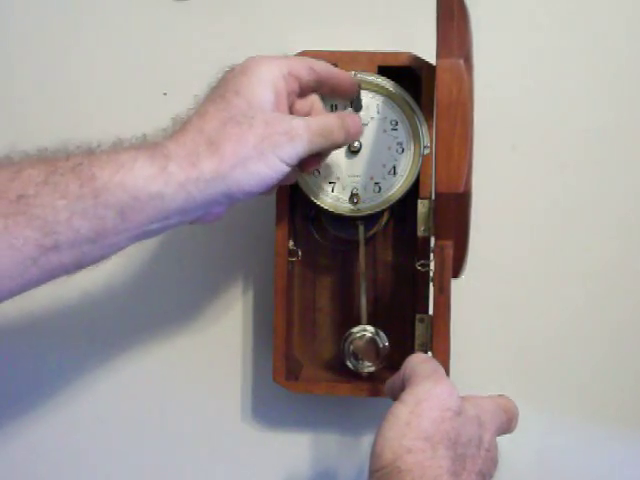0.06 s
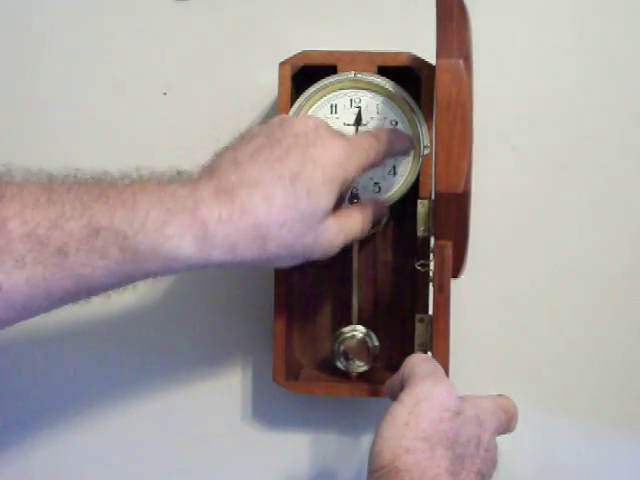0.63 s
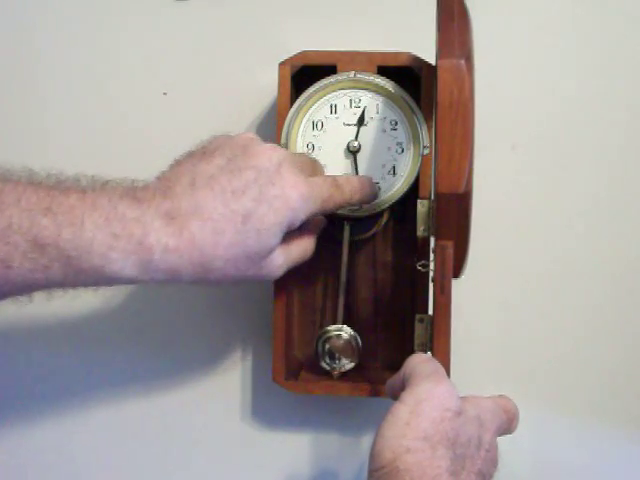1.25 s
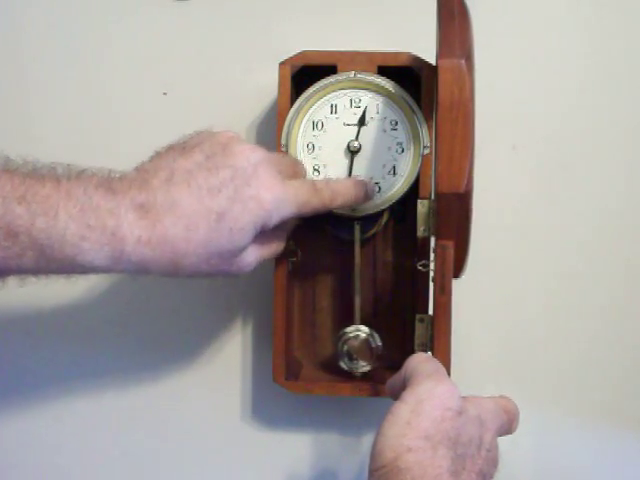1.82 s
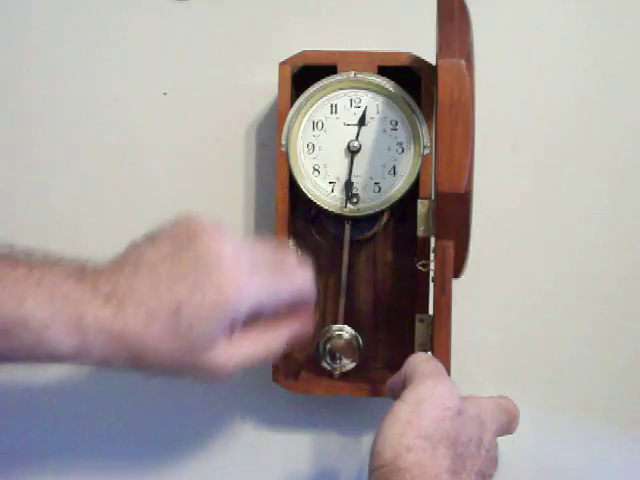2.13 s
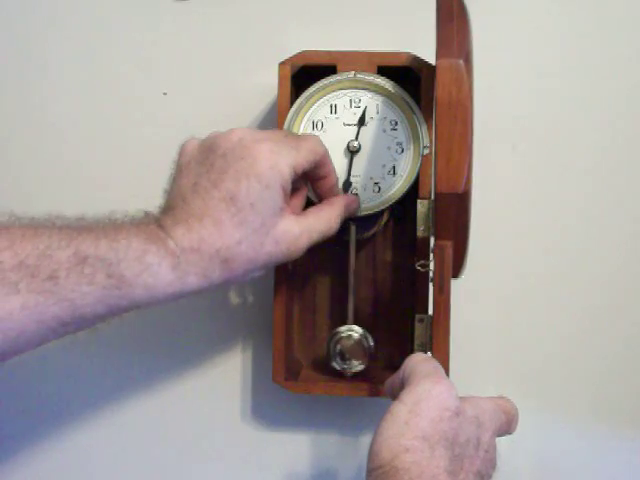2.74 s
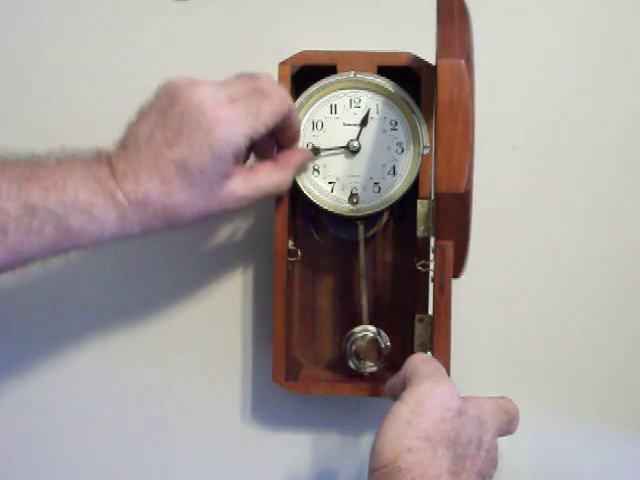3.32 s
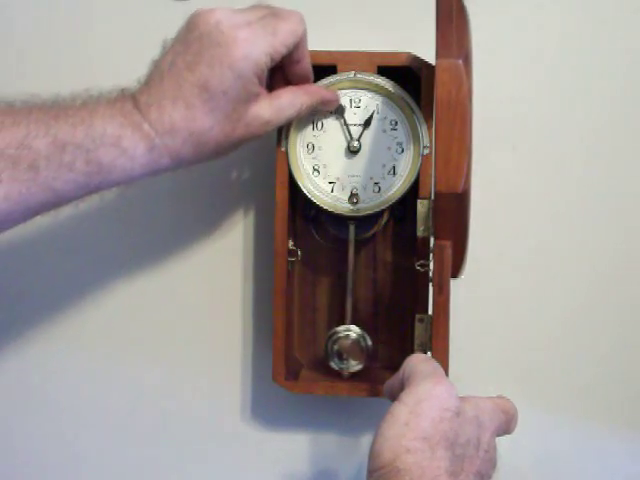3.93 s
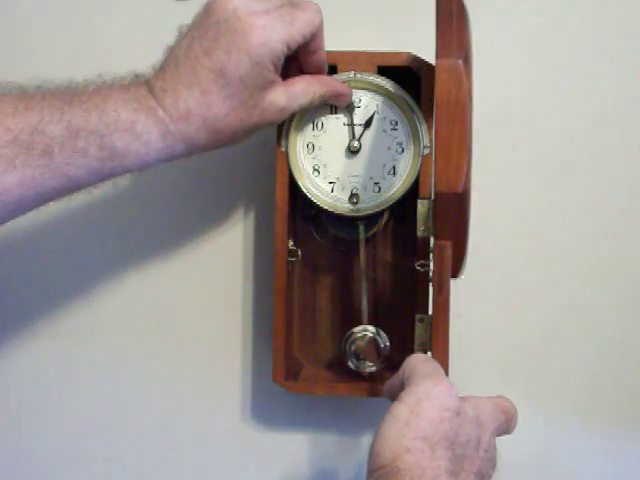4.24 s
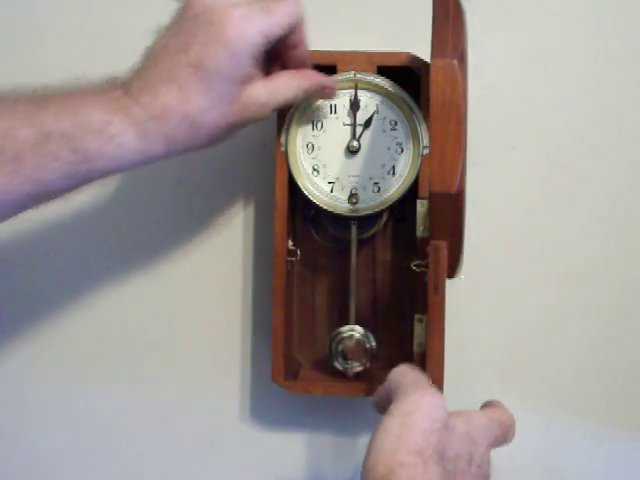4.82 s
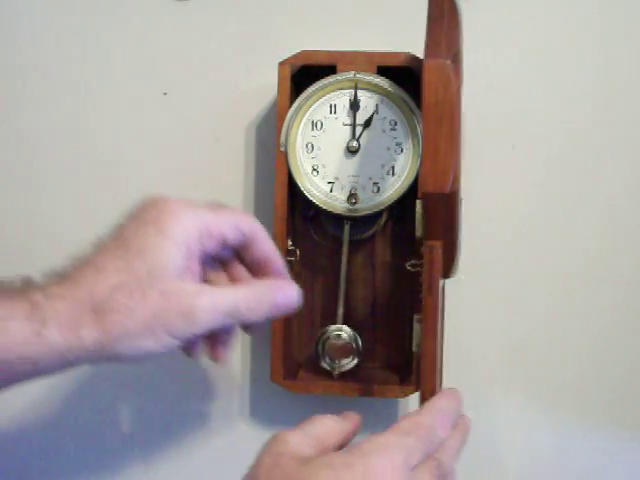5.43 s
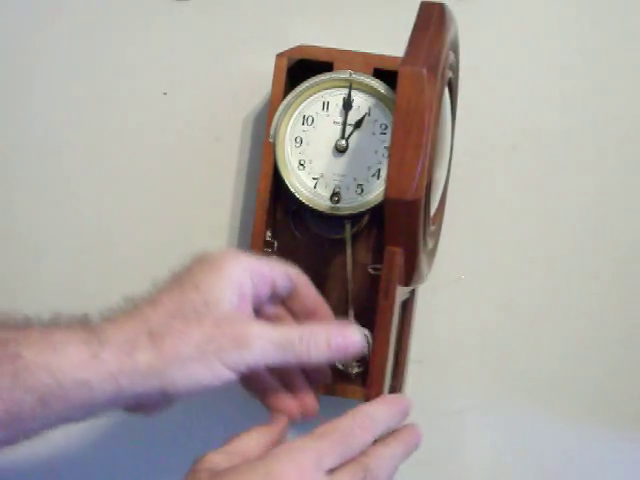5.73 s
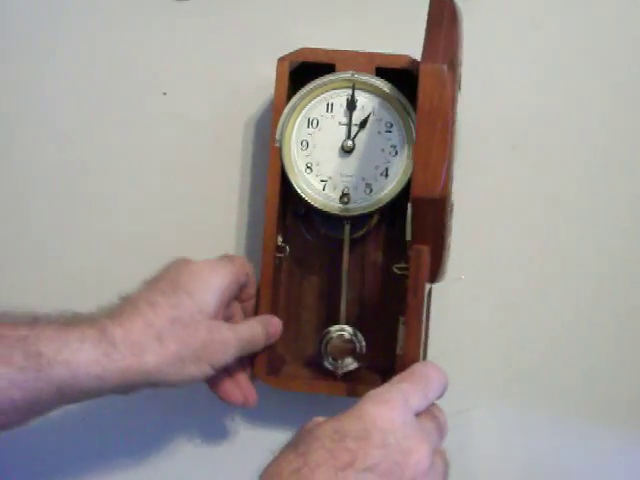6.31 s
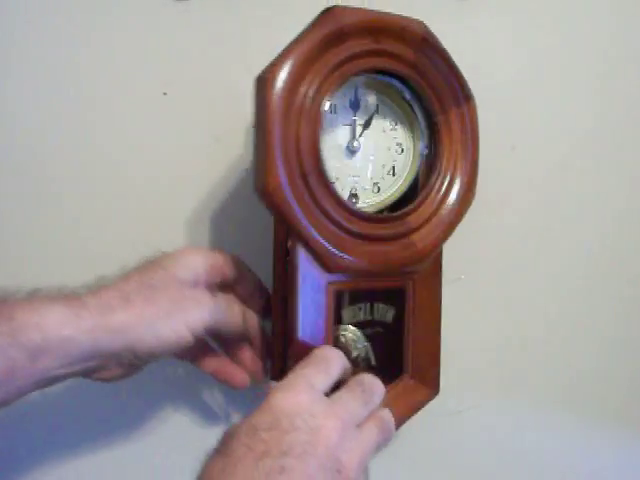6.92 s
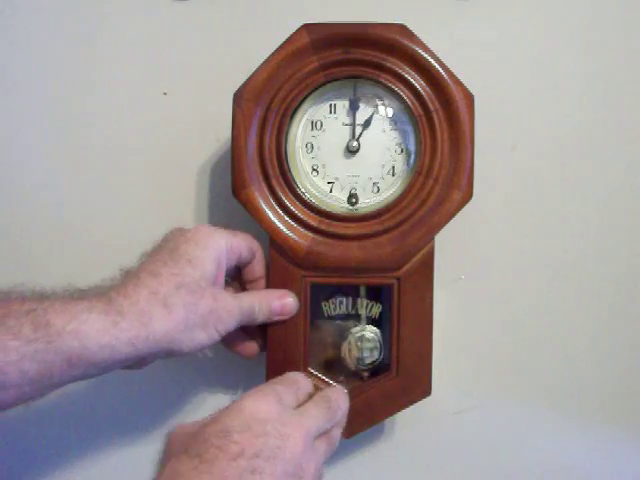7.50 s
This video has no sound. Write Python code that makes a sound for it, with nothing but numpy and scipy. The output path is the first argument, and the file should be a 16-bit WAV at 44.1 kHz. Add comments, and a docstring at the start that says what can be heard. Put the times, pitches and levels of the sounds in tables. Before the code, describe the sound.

Over room hiss, a pendulum clock ticks unevenly, its high bell strikes twice, seconds apart, and its door closes with a loud, rattling knock.

```python
"""Room hiss and the last faint ring of a bell are heard first, then a small pendulum wall clock ticks
as its pallets catch the escape wheel. A finger turns the minute hand, with light touches and rubs.
A hammer strikes the bell once at the half hour and once at the hour; two close partials beat in its ring.
Last, the glazed wooden door bumps, knocks shut close to the microphone and rattles."""
import sys
import numpy as np
from scipy import signal
from scipy.fft import rfft, irfft
from scipy.io import wavfile
from scipy.ndimage import uniform_filter1d

SR = 44100
rng = np.random.default_rng(int(sys.argv[2]) if len(sys.argv) > 2 else 0)


def master_out(mix):
    """Clip the mix to full scale and print it as 16-bit PCM to the path in sys.argv[1]."""
    frames = np.transpose(np.atleast_2d(mix))
    ceiling = np.clip(frames, -1, 1)
    pcm = np.round(ceiling * 32767).astype(np.int16)
    wavfile.write(sys.argv[1], SR, pcm)


N = 333396
TIME = np.arange(N) / SR
AFTER = TIME[:SR // 2]  # time since a blow

# spectra of the room's hiss and rumble: (f/Hz, relative level/dB)
HISS_SPECTRUM = [(88, -36.5), (150, -1.5), (282, -3.5), (353, -2), (448, -5.5), (537, -2.5), (652, -7),
                 (816, -5), (1680, -11.5), (1890, -11), (2590, -14), (4180, -13), (5400, -19.5),
                 (7020, -67), (11900, -120)]
RUMBLE_SPECTRUM = [(5, -8), (25, 5), (42, 1), (55, -2), (64, -0.5), (85, -12.5), (116, -2.5), (145, -12),
                   (200, -32), (500, -74.5)]
# reverberation time of the room: (f/Hz, T60/s)
ROOM_DECAY = [(150, 0.19), (1000, 0.6), (3500, 0.45), (6000, 0.22)]
# the bell's three partials: (f/Hz), and for each of them (level/dB, T60/s)
BELL_HZ = [2995.2, 3076.7, 3678]
BELL_PARTIALS = [(1.5, 2.725), (-11.5, 3), (-18, 0.32)]
# strokes of the bell: (t/s, hammer/dB, back board/dB, ring/dB, boost of the second partial/dB)
STROKES = [(1.6445, -13.5, -33, -11.5, 1), (4.459, -12, -27.5, -12.5, 3.5)]
# the ring dips briefly after each stroke: (t/s, depth/dB, half width/s)
RING_DIPS = [(1.913, 2.698, 0.055), (4.604, 6.199, 0.19)]
# tick and tock in turn, made uneven by the finger on the hand: (t/s, level/dB, thin edge/dB)
TICKS = [(0.3064, -18, 0), (0.6071, -21, -1), (1.1502, -18, -2), (1.4534, -23, 8.5), (2.030, -24.5, -2),
         (2.2964, -23, -6), (2.837, -16.5, -10), (3.1357, -19, 3.5), (3.6615, -20.5, -5),
         (3.9644, -26.5, -1), (4.516, -20.5, -3), (4.8157, -25, -17)]
# contact spectra of metal, of the thin edge on top of it and of wood: (f/Hz, relative level/dB)
SNAP_SPECTRUM = [(100, -42), (2000, -13.5), (2900, 2), (3800, 9), (4350, 4), (4750, -14), (6500, -17)]
EDGE_SPECTRUM = [(1000, -51), (4200, -8.5), (4850, 4), (5400, -4), (6000, -11), (7500, -20)]
CLACK_SPECTRUM = [(60, -30), (400, -6), (1100, -2), (1700, -3.5), (2050, -9.5), (2330, 0.5), (2650, -13.5),
                  (6000, -29)]
# modes of the brass movement, wooden case and back board: (f/Hz, relative level/dB, T60/s)
BRASS_MODES = [(2970, -4, 0.085), (3140, -2.5, 0.063), (3370, -1.5, 0.039), (3620, -1, 0.059),
               (3890, -2.5, 0.055), (4020, -3, .04), (4190, -2, 0.051), (4580, -9.5, 0.042),
               (4910, -2, 0.026), (5320, -4.5, 0.024)]
CASE_MODES = [(1063, -5, 0.18), (1198, -4.5, 0.11), (1378, -7.5, 0.092), (1570, -9, 0.044), (1710, -5, .06),
              (2176, -5, 0.077), (2356, -3.5, 0.055)]
BOARD_MODES = [(607, 2, 0.22), (651, -0.5, 0.29), (505, -7.5, 0.12)]
# lever release, hammer impact and bounce: (delay/s, relative level/dB, hardness/dB, thin edge/dB)
HAMMER_CONTACTS = [(-0.003, -9, 8.5, 8.5), (0, 1.5, 3.5, -6.5), (0.0046, -11, 5.5, -9.5)]
# light touches on the hand, levers and case: (t/s, level/dB, hardness/dB)
TOUCHES = [(1.703, -27.5, 3), (2.125, -30, -1), (3.639, -35, 3), (4.045, -35, -0.5), (5.024, -37.5, -5),
           (6.007, -34, -4), (6.073, -32.5, 0), (6.203, -33.5, -3.5), (6.99, -34.5, -5.5), (7.195, -29, 5)]
# a train of tiny dry pips on each ring: (t/s, level/dB, fade/(dB/s))
PIP_TRAINS = [(1.759, -24.5, 17), (4.535, -14, 55)]
# hands slide on dial and case and swing the door: (t/s, duration/s, rub/dB, scuff/dB, swish/dB)
RUBS = [(1.78, 0.29, -53, -41.5, -58), (3.982, 0.17, -63, -38, -61), (5.018, 0.2, -47, -41, -64),
        (5.45, 0.31, -34, -51, -44.5), (6.0, 0.55, -36.5, -56, -53)]
# low, middle and high spectra of that friction: (f/Hz, relative level/dB)
RUB_SPECTRUM = [(40, -3.5), (115, 2), (200, 0), (280, -27), (1100, -36)]
SCUFF_SPECTRUM = [(200, -28), (700, -6), (1100, -3.5), (2000, -1.5), (2700, -17), (6000, -24.5)]
SWISH_SPECTRUM = [(1000, -25.5), (3000, -12.5), (4400, 8.5), (5200, 12.5), (6000, -14), (8000, -30.5)]
# soft bumps of door and hand on the case: (t/s, level/dB, f/Hz, rise time/s)
BUMPS = [(7.2, -16, 401, 0.0059), (7.239, -22.5, 147, 0.0062), (7.478, -19, 180, 0.0074),
         (7.539, -5.5, 234, 0.0017)]
# blows of the door as it shuts and rebounds: (t/s, level/dB, decay time/s)
DOOR_BLOWS = [(7.4264, -0.5, 0.0038), (7.4275, 2.5, 0.0022), (7.452, -16, 0.013), (7.473, -20, .003),
              (7.5264, -8.5, 0.0017)]
# modes of the door: (f/Hz, relative level/dB, T60/s)
DOOR_MODES = [(105.6, -10, 0.69), (162, -2, 0.33), (274, -10, .35), (422, 4, 0.28), (713, 16, 0.11),
              (1056, -13, .25), (1280, -9, .25), (1480, -10, .3), (2570, -10, .15)]
# spectra of the door's knock and rattle: (f/Hz, relative level/dB)
KNOCK_SPECTRUM = [(40, -17.5), (200, 7.5), (700, 1.5), (1300, 5.5), (1700, -21), (2100, 0), (3000, 1.5),
                  (4000, -8), (5400, -14.5), (7000, -38)]
RATTLE_SPECTRUM = [(24, -47), (40, -25), (108, -1), (141, -10), (268, -2), (336, -9), (769, -13),
                   (908, -16.5), (1190, -7), (1370, -8.5), (1490, -7.5), (1760, -18.5), (2300, -15.5),
                   (4190, -23), (5600, -35), (7280, -65), (12300, -120)]


def amp(db):
    """Amplitude ratio of a level in decibels."""
    return 10 ** (np.asarray(db) / 20)


def unit_rms(x):
    """Normalisation to an rms of 1."""
    return x / np.sqrt(np.mean(x ** 2) + 1e-20)


def curve_at(points, hz):
    """Interpolation on a logarithmic frequency axis."""
    f, value = np.transpose(points)
    return np.interp(np.log(hz + 1), np.log(f + 1), value)


def add(mix, start, sound):
    """Superposition: a sound joins the mix at its start time in seconds."""
    part = mix[max(round(start * SR), 0):][:len(sound)]
    part += sound[:len(part)]


def coloured(x, spectrum):
    """Spectral shaping: x is filtered by a spectrum and scaled to rms 1."""
    gain = amp(curve_at(spectrum, np.fft.rfftfreq(len(x), 1 / SR)))
    return unit_rms(irfft(rfft(x) * gain, len(x)))


def crack(spectrum, decay_s):
    """Contact transient: a brief force has a broad spectrum, here a fast-decaying puff of noise."""
    envelope = np.exp(-AFTER / decay_s) * (1 - np.exp(-AFTER / 0.00038))
    puff = coloured(rng.standard_normal(len(AFTER)), spectrum) * envelope
    return puff * np.linalg.norm(envelope) / np.linalg.norm(puff)


def ring(modes):
    """Free vibration: a sum of damped modes, excited a little differently by each blow."""
    hz, db, t60 = np.transpose(modes)[:, :, None]
    sizes = amp(db + 2 * rng.standard_normal(db.shape))
    waves = np.sin(2 * np.pi * (hz * AFTER + rng.random(hz.shape))) * amp(-60 * AFTER / t60)
    onset = 1 - np.exp(-AFTER / 0.0005)
    return (sizes * waves).sum(0) / np.sqrt(np.sum(sizes ** 2) / 2) * onset


def reverberation(x, echoes_per_s=3000):
    """Sparse reflections in a small room; absorption gives each band its own decay rate."""
    signs = rng.choice([-1., 1.], len(AFTER))
    arrivals = (rng.random(len(AFTER)) < echoes_per_s / SR) * (AFTER > .005)
    hz, t, bands = signal.stft(signs * arrivals, SR, nperseg=256)
    decay = amp(-60 * t / curve_at(ROOM_DECAY, hz)[:, None])
    tail = signal.istft(bands * decay, SR, nperseg=256)[1]
    return signal.fftconvolve(x, tail / np.linalg.norm(tail))[:N]


def room_noise(hiss_db=-34, rumble_db=-33, waver_db=0.15):
    """Broadband noise: a hiss with slight, slow amplitude modulation lies over a low rumble."""
    rates_hz = np.geomspace(.5, 12, 20)
    waver = unit_rms(sum(np.sin(2 * np.pi * (f * TIME + rng.random())) / np.sqrt(f) for f in rates_hz))
    hiss = coloured(rng.standard_normal(N), HISS_SPECTRUM) * amp(hiss_db + waver_db * waver)
    rumble = coloured(rng.standard_normal(N), RUMBLE_SPECTRUM) * amp(rumble_db)
    return hiss + rumble


def bell(build_s=0.0067, linger_db=-39.5, linger_boost_db=5.5):
    """Interference: two close partials beat at their difference, about 80 Hz; a third dies quickly."""
    rings = [(0, linger_db, linger_boost_db)]  # an earlier stroke is still dying away
    rings += [(start, ring_db, boost_db) for start, _, _, ring_db, boost_db in STROKES]
    onset = 1 - np.exp(-TIME / build_s)  # the tone takes a moment to fill the case
    out = np.zeros(N)
    for start, ring_db, boost_db in rings:
        for hz, (db, t60), extra_db in zip(BELL_HZ, BELL_PARTIALS, (0, boost_db, 0)):
            envelope = amp(ring_db + db + extra_db - 60 * TIME / t60) * onset
            add(out, start, envelope * np.sin(2 * np.pi * (hz * TIME + rng.random())))
    dip_db = sum(depth * np.exp(-((TIME - centre) / width) ** 2) for centre, depth, width in RING_DIPS)
    return out * amp(-dip_db)


def clicks(contacts, snap_db, brass_db, clack_db, case_db, snap_s, clack_s, room_db, lag_s=0.000987):
    """Coupled vibration: metal meets metal, then the case answers; hardness favours metal over wood."""
    out = np.zeros(N)
    for start, db, hard_db, edge_db in contacts:
        edge = amp(edge_db) * crack(EDGE_SPECTRUM, snap_s)
        metal = amp(snap_db) * crack(SNAP_SPECTRUM, snap_s) + amp(brass_db) * ring(BRASS_MODES)
        wood = amp(clack_db) * crack(CLACK_SPECTRUM, clack_s) + amp(case_db) * ring(CASE_MODES)
        add(out, start, amp(db) * (edge + amp(hard_db) * metal))
        add(out, start + lag_s, amp(db - hard_db) * wood)
    return out + amp(room_db) * reverberation(out)


def escapement(tick_hard_db=3, tock_hard_db=5):
    """Impact excitation: two pallets catch the wheel in turn, one sounding woody, the other bright."""
    contacts = [(start, db, tock_hard_db if k % 2 else tick_hard_db, edge_db)
                for k, (start, db, edge_db) in enumerate(TICKS)]
    return clicks(contacts, snap_db=0, brass_db=-7, clack_db=1.5, case_db=-3.5,
                  snap_s=0.0023, clack_s=0.0052, room_db=-8.5)


def hammer():
    """Impact and rebound: at each stroke the lever lets go, and the hammer lands and bounces."""
    contacts = [(start + delay, stroke_db + db, hard_db, edge_db)
                for start, stroke_db, *_ in STROKES
                for delay, db, hard_db, edge_db in HAMMER_CONTACTS]
    return clicks(contacts, snap_db=3, brass_db=-5, clack_db=3, case_db=-8.5,
                  snap_s=0.0019, clack_s=0.0036, room_db=-6)


def back_board():
    """Structure-borne sound: the hammer's heavy blow crosses the frame to the back board's low modes."""
    out = np.zeros(N)
    for start, _, board_db, _, _ in STROKES:
        add(out, start, amp(board_db) * ring(BOARD_MODES))
    return out


def touches(edge_db=-7, edge_growth=1.7):
    """Soft impacts last longer: fingers, levers and door click, with more thin edge the harder they hit."""
    contacts = [(start, db, hard_db, edge_db + edge_growth * hard_db) for start, db, hard_db in TOUCHES]
    return clicks(contacts, snap_db=0, brass_db=-9.5, clack_db=-1, case_db=-6.5,
                  snap_s=0.0072, clack_s=0.012, room_db=-8.5)


def pips(hz=3700, width_s=0.00076, period_s=0.0567, count=4):
    """Tone bursts: a few cycles under a Gaussian envelope recur evenly and fade over each ring."""
    t = np.arange(-SR // 200, SR // 200) / SR
    envelope = np.exp(-.5 * (t / width_s) ** 2)
    out = np.zeros(N)
    for start, db, fade_db_per_s in PIP_TRAINS:
        for delay in np.arange(count) * period_s:
            pip = envelope * np.sin(2 * np.pi * (hz * t + rng.random()))
            add(out, start + delay + t[0], amp(db - fade_db_per_s * delay) * pip)
    return out


def rubs(grip_db=3, slip_s=0.018):
    """Sliding friction: skin drags unevenly over dial and varnished wood with a rub, scuff and swish."""
    spectra = (RUB_SPECTRUM, SCUFF_SPECTRUM, SWISH_SPECTRUM)
    out = np.zeros(N)
    for start, duration, *levels_db in RUBS:
        envelope = np.sin(np.pi * np.minimum(TIME[:SR] / duration, 1))
        unevenness = unit_rms(uniform_filter1d(rng.standard_normal(SR), int(slip_s * SR)))
        friction = sum(amp(db) * coloured(rng.standard_normal(SR), spectrum)
                       for db, spectrum in zip(levels_db, spectra))
        add(out, start, envelope * amp(grip_db * unevenness) * friction)
    return out


def bumps(room_db=-8):
    """Damped resonance: each soft contact swells and fades on one low note of the wood."""
    out = np.zeros(N)
    for start, db, hz, rise_s in BUMPS:
        age = AFTER / rise_s
        envelope = (age * np.exp(1 - age)) ** 2
        add(out, start, amp(db) * envelope * np.sin(2 * np.pi * hz * AFTER))
    return out + amp(room_db) * reverberation(out)


def door(ring_db=-23, room_db=-13):
    """Repeated collision: the door knocks shut and rebounds, exciting the modes of frame and glass."""
    out = np.zeros(N)
    for start, db, decay_s in DOOR_BLOWS:
        add(out, start, amp(db) * (crack(KNOCK_SPECTRUM, decay_s) + amp(ring_db) * ring(DOOR_MODES)))
    return out + amp(room_db) * reverberation(out)


def rattle(start_s=7.431, lag_s=0.017, attack_s=0.01, hold_s=0.077, fade_db_per_s=80,
           impacts_per_s=7000, spread_db=4, level_db=-14, faint_db=-14):
    """Shot noise: loose glass, latch and works shake in a dense run of tiny random impacts."""
    sizes = amp(spread_db * np.minimum(rng.exponential(1, N), 4)) * rng.choice([-1., 1.], N)
    impacts = sizes * (rng.random(N) < impacts_per_s / SR)
    t = TIME - start_s - lag_s  # faint at the knock, it swells after a lag
    swell_db = faint_db * (1 - np.clip(t / attack_s, 0, 1))
    fade_db = fade_db_per_s * np.maximum(t - attack_s - hold_s, 0)
    envelope = amp(level_db + swell_db - fade_db) * (TIME > start_s)
    return coloured(impacts, RATTLE_SPECTRUM) * envelope


def scene():
    """Superposition: the clock, the faint pips on its ring, the hands on it, its door and the room sum in one
    channel."""
    clock_and_pips = escapement() + hammer() + back_board() + bell() + pips()
    return (clock_and_pips + touches() + rubs() + door() + rattle() + bumps() + room_noise())[None]


def low_pass(x, hz, taps):
    """Zero-phase filtering: a centred, symmetric kernel cuts the treble steeply without delay."""
    kernel = signal.firwin(taps, hz, window=("kaiser", 8), fs=SR)
    return signal.oaconvolve(x, kernel[None], "same")


def record(dry):
    """Band limiting and clipping: a narrow-band microphone channel overloads on the door's knock."""
    narrow = low_pass(dry, hz=5680, taps=301)
    return low_pass(np.clip(narrow, -1, 1), hz=14000, taps=511)


dry = scene()
out = record(dry)
master_out(out)
```